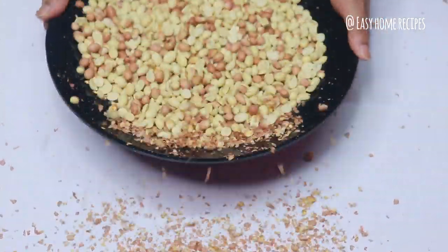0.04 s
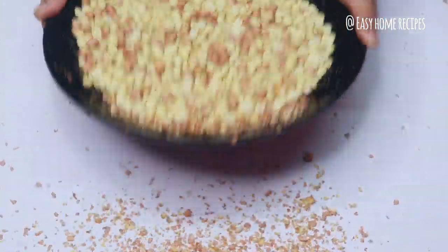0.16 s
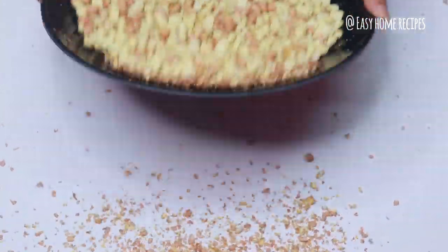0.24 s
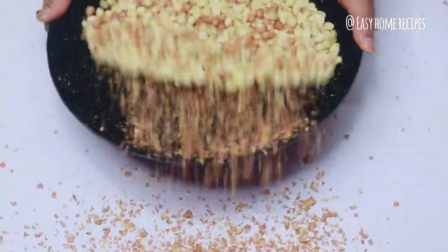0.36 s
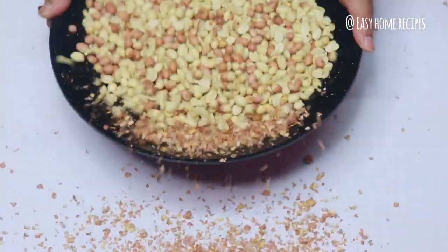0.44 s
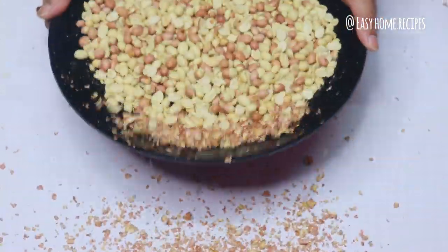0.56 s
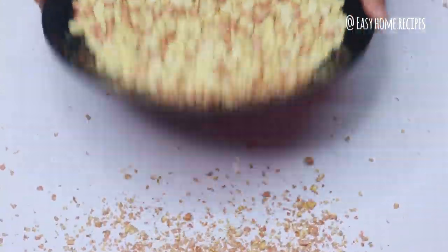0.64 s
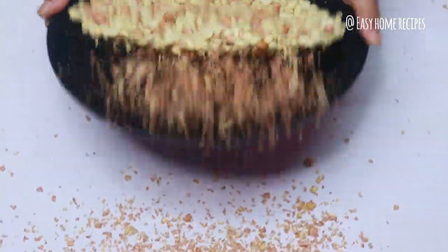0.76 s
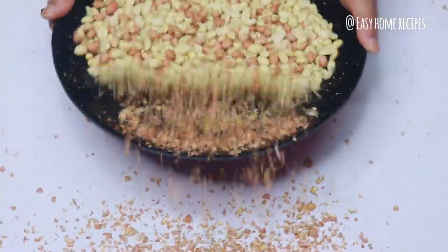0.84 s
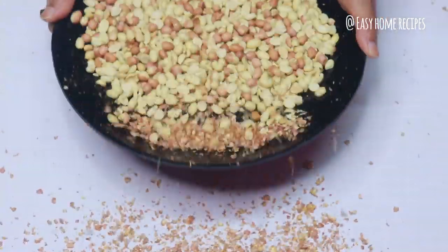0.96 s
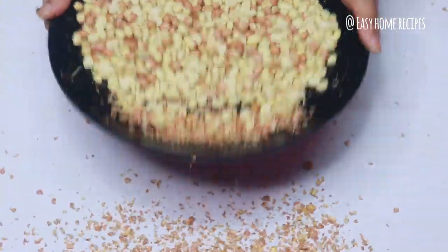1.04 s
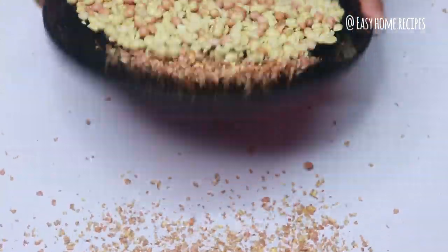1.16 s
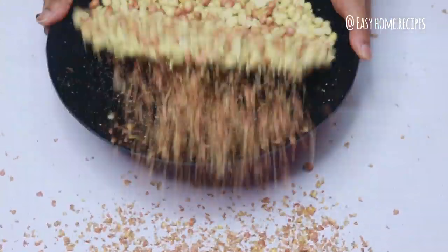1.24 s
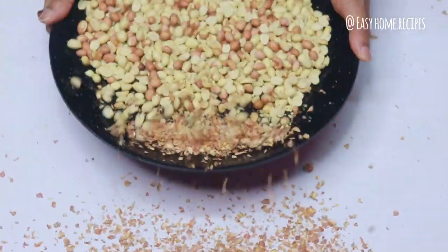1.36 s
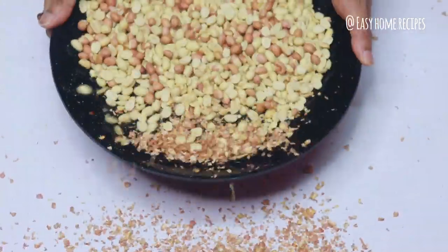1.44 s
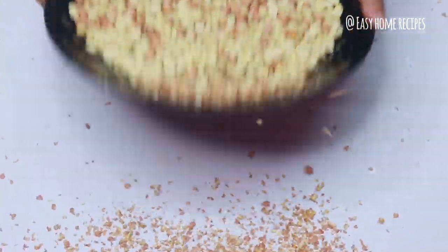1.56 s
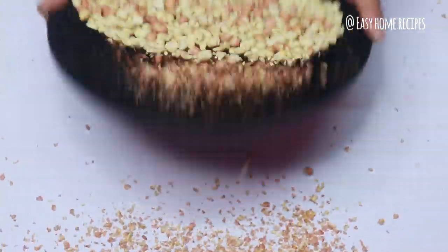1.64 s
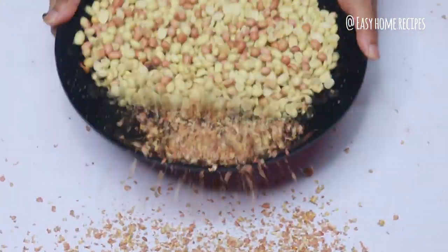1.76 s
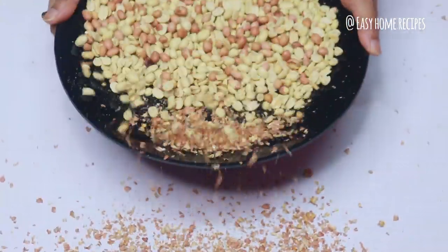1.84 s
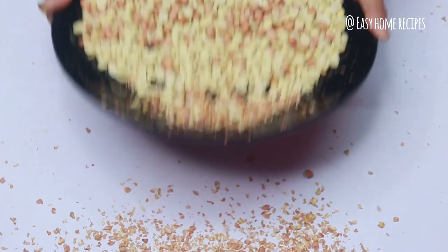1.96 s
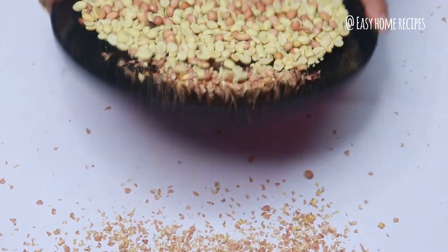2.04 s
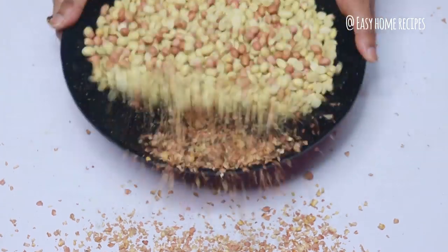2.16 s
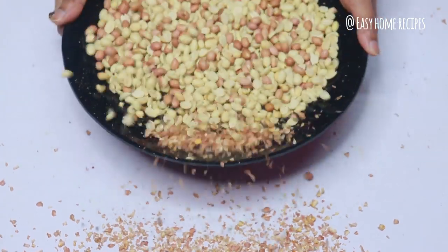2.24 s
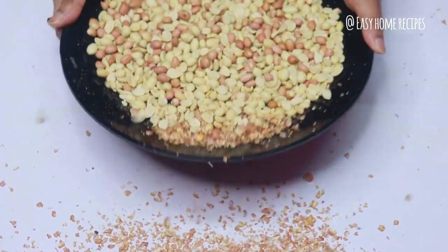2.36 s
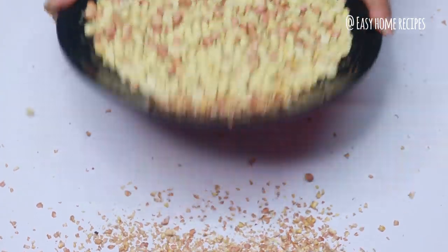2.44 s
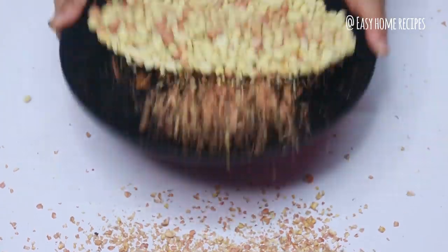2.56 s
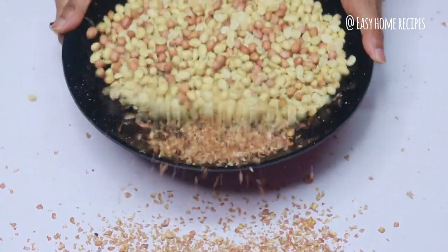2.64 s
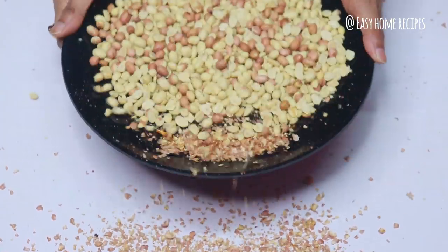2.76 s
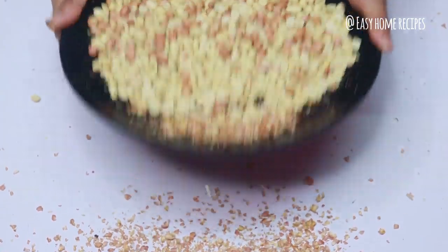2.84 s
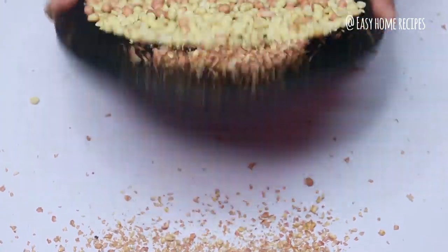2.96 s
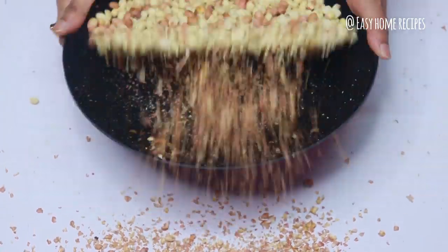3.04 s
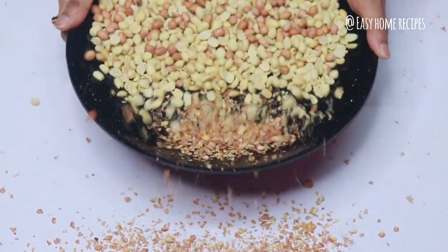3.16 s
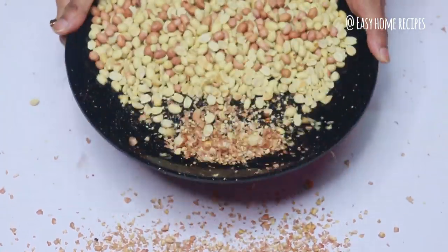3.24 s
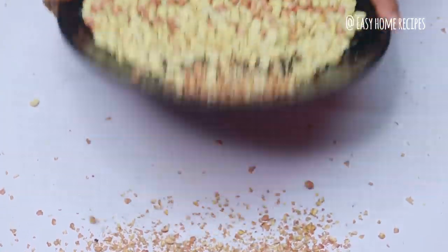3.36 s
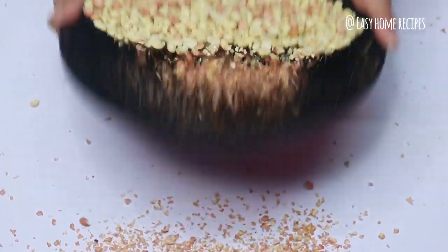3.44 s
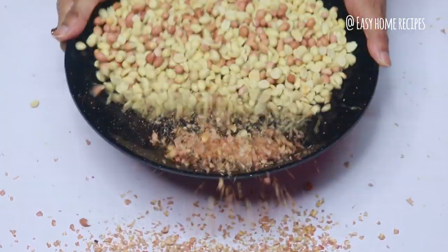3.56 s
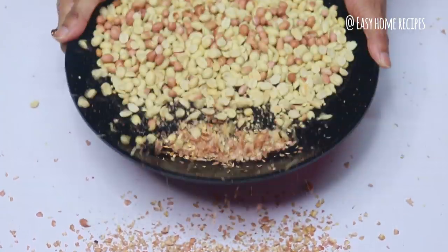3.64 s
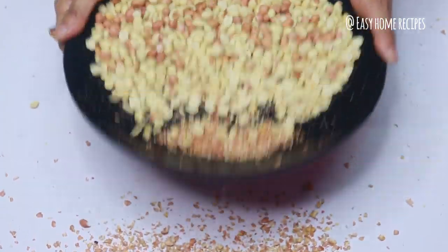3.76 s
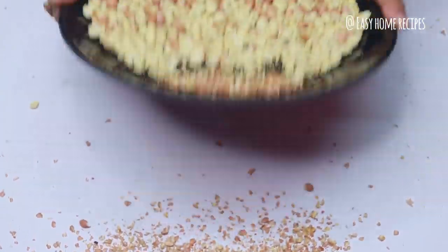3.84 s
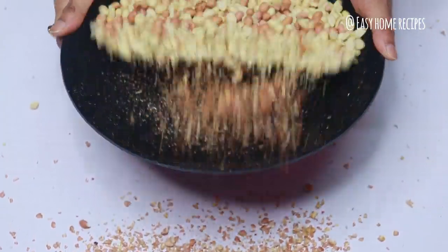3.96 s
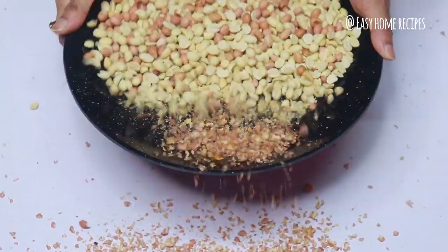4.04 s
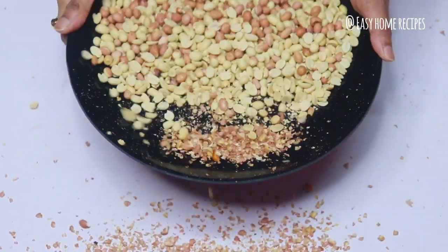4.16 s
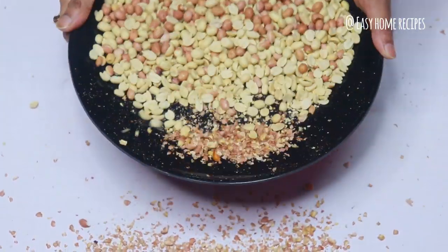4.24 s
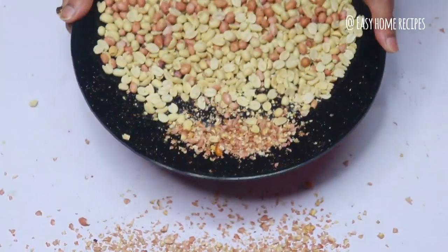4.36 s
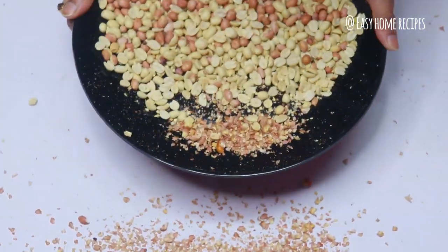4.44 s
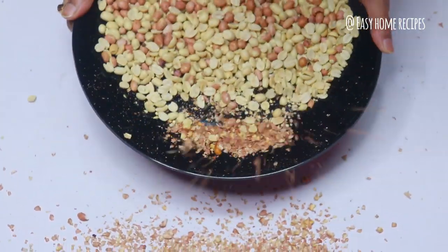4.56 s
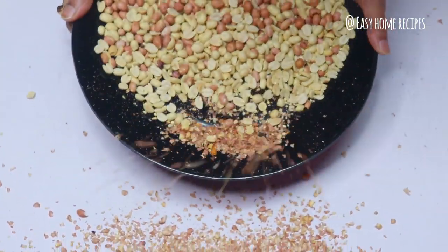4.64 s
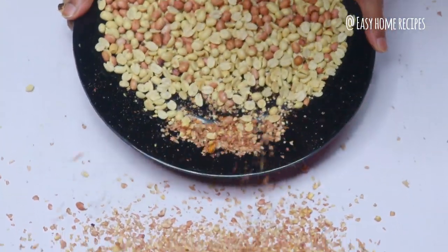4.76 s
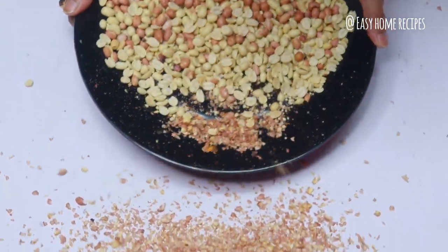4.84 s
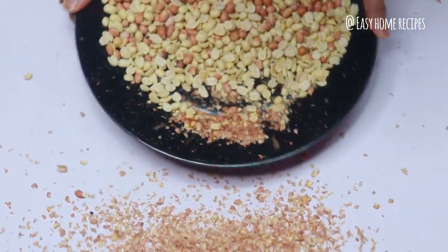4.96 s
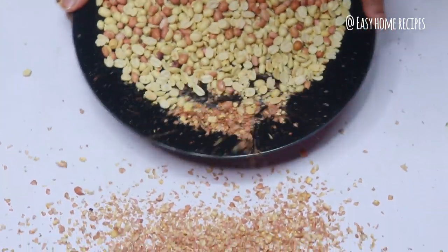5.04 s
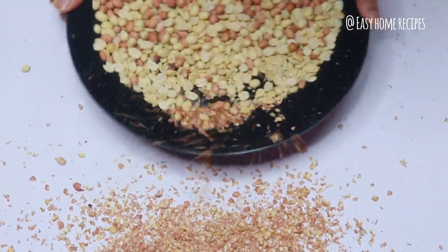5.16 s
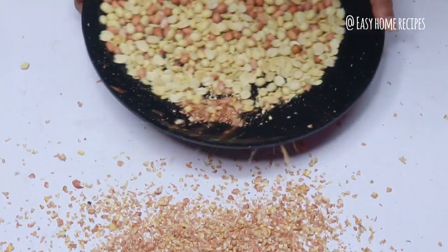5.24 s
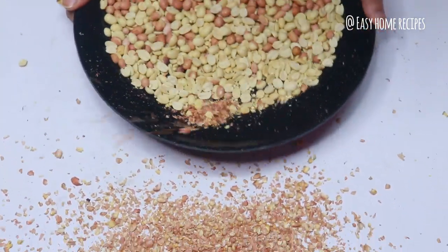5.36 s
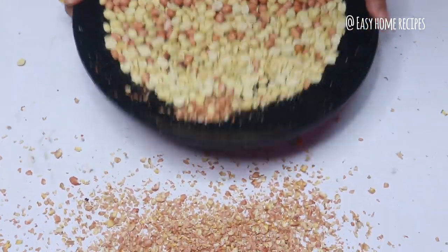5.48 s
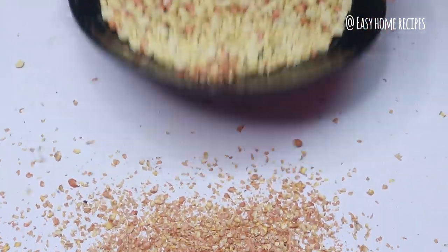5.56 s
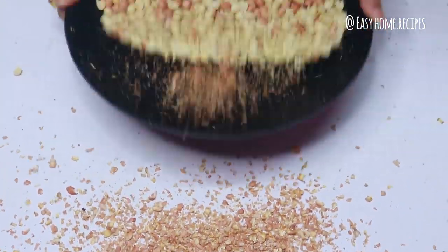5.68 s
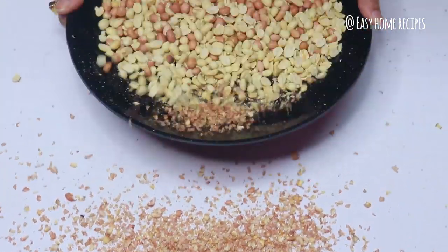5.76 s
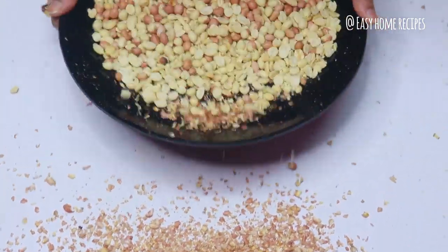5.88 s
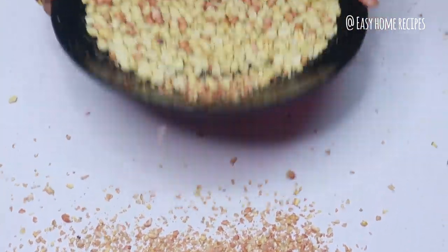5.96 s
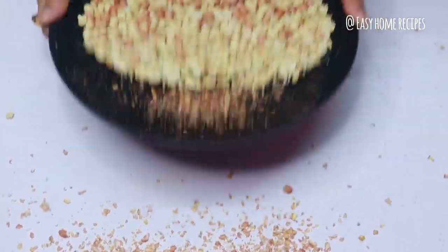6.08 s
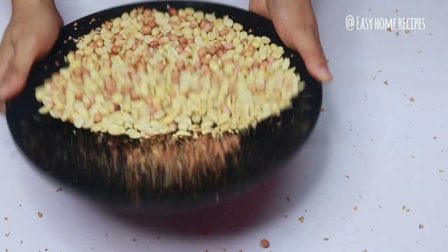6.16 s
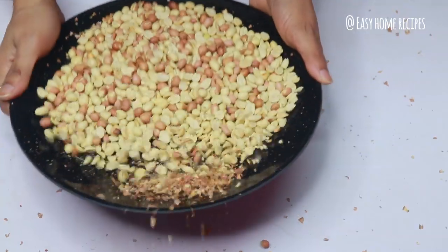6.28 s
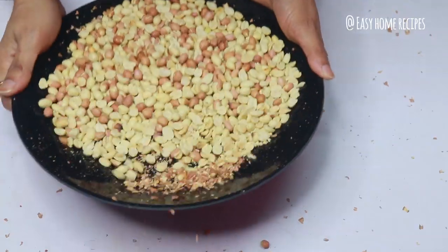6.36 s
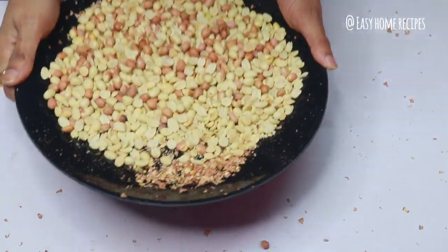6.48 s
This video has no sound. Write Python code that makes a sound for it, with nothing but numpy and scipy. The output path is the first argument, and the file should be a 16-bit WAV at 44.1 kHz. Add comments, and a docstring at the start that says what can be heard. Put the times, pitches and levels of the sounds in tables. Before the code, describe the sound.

Roasted peanuts tossed again and again on a hand-held plate, each landing a loud rattling shower, with a soft sliding pause and two knocks.

```python
"""Roasted peanuts are tossed on a hand-held plate in a kitchen to shake their loose skins off.
Each toss slides, then comes down as a shower of tiny impacts that ring the plate and the room;
loose nuts roll and skins tick after it. In the pause after four seconds the heap slides softly
and the plate is knocked twice, then the last tosses follow. Shaped noise gives steady still air and
low rumble, with rubbing whenever the hands shift. The near microphone clips the loudest peaks."""
import sys
import numpy as np
from scipy import signal
from scipy.fft import rfft, irfft, next_fast_len
from scipy.io import wavfile
from scipy.ndimage import uniform_filter1d, minimum_filter1d

SR = 44100
rng = np.random.default_rng(int(sys.argv[2]) if len(sys.argv) > 2 else 0)


def unload_wav(signal):
    """Save mono or channel-first audio to the path in sys.argv[1] as 16-bit WAV at rate SR, clipped to [-1, 1]."""
    wavfile.write(
        sys.argv[1],
        SR,
        np.round(np.clip(np.atleast_2d(signal).T, -1, 1) * 32767).astype(np.int16),
    )


N = 287355
SIZE = next_fast_len(N + SR)  # transform length, with room for tails
FREQ = np.maximum(np.arange(SIZE // 2 + 1) * SR / SIZE, 1)  # Hz
TIME = np.arange(N) / SR  # s

# Showers of landing nuts, from whole tosses down to small handfuls. Each row: start in seconds, rise in
# seconds, fall in seconds, level in dB, brightness in dB per octave, deep thud of the plate in dB,
# slide before it in dB, rolling after it in dB.
SHOWERS = [(-.135, 0.1, 0.061, -7, -2.3, -17, -48.5, -52), (.369, 0.054, 0.046, -4, -1, 5, -51, -45),
           (.738, 0.0031, 0.03, -34.5, -3, 2, -48, -58), (0.798, 0.068, 0.0496, -4.5, -1, 3.5, -45.5, -47),
           (1.253, .062, .054, -3, -1.43, 1, -56, -44), (1.712, 0.069, 0.045, -5.5, -1.06, 2.5, -54, -44),
           (2.139, 0.056, .041, -2, -1.5, 0, -46.5, -39), (2.604, 0.056, 0.045, -1.68, -1.4, -1, -53, -62),
           (3.034, 0.073, .062, -5, -1, 1.5, -48.5, -56), (3.503, .070, .048, -5.5, -0.84, 6, -57, -38),
           (3.968, 0.063, 0.06, -6, -0.93, 3, -66, -64), (5.693, 0.061, 0.041, -5.5, -2.5, -7, -52, -69),
           (6.170, .006, .025, -16, 0.1, 5, -50, -62), (6.198, .066, 0.048, -7, -1.13, 4, -63, -62)]
# Knocks on the plate. Each row: start in seconds, level in dB, contact cut-off in Hz.
PLATE_KNOCKS = [(5.400, -8, 1930), (5.438, 0, 3100)]
# The pause, with the heap moving on the tilted plate. Each row: time in seconds, level of the soft
# scraping in dB and of the rolling nuts in dB, both ahead of a trim.
TILT_PAUSE = [(4.38, -59, -69), (4.398, -56, -79), (4.706, -45.5, -71), (4.99, -50.5, -73),
              (5.032, -48.5, -55), (5.122, -54, -59), (5.23, -49.5, -55), (5.36, -48.5, -57)]
# The hands shift and swing the plate. Each row: middle in seconds, half length in seconds,
# boom in dB, dull rubbing in dB ahead of its flutter.
HAND_MOVES = [(0.19, 0.046, -39, -67), (0.344, 0.024, -47, -47), (1.46, 0.05, -41.5, -55),
              (2.27, 0.1, -42, -62), (2.81, 0.08, -37.5, -62), (4.31, 0.16, -34.5, -48),
              (4.712, 0.21, -39.5, -48), (5.54, 0.057, -32.5, -51), (5.79, .14, -37, -46),
              (6.02, 0.056, -38, -41.5)]
# Centres of the bands in which the nuts are shaped, in Hz.
NUT_BANDS = [350, 800, 1700, 3500, 7000, 14000]
MIDDLE_HZ = NUT_BANDS[2]  # brightness tilts around this note


def undb(db):
    """Decibels to gain."""
    return 10 ** (np.asarray(db) / 20)


def unit(x):
    """Scale to rms 1."""
    return x / np.sqrt(np.mean(x ** 2))


def contour(hz, values):
    """Join points by straight lines over log frequency."""
    return np.interp(np.log(FREQ), np.log(hz), values)


def filtered(x, response):
    """Pass a sound through a frequency response."""
    return irfft(rfft(x, SIZE) * response, SIZE)[:N]


def causal(db):
    """Minimum-phase response of unit energy: it rings after a hit, never before."""
    cepstrum = irfft(np.log(undb(db)), SIZE)
    # fold the mirrored half forward in time
    cepstrum[1:SIZE // 2] *= 2
    cepstrum[SIZE // 2 + 1:] = 0
    response = np.exp(rfft(cepstrum))
    return response / np.sqrt(np.mean(np.abs(response) ** 2))


def noise(colour):
    """Noise of rms 1 with a (Hz, dB) colour."""
    gain = undb(contour(*np.transpose(colour)))
    return unit(filtered(rng.standard_normal(N), gain))


def add(track, s, sound):
    """Mix a short sound in at time s."""
    start = max(int(s * SR), 0)
    track[start:start + len(sound)] += sound[:max(N - start, 0)]


def decay(t, t60):
    """Amplitude that dies by 60 dB in t60 seconds."""
    return np.exp(-np.log(1000) * t / t60)


def hump(s, width_s, db):
    """Power of a smooth swell centred on time s."""
    distance = (TIME - s) / width_s
    return (undb(db) * np.exp(-np.minimum(distance ** 2, 20))) ** 2


def wander(rate):
    """Random drift of rms 1 that takes a new direction `rate` times a second."""
    return unit(np.interp(TIME * rate, np.arange(256), rng.standard_normal(256)))


def impacts(chance):
    """Random impacts by chance per sample: positions, direction of push, weight as a bell-shaped score."""
    at = np.flatnonzero(rng.random(N) < chance)
    sign = rng.choice([-1, 1], len(at))
    weight = np.clip(rng.standard_normal(len(at)), -2, 2)
    return at, sign, weight


def kitchen(wet_db=0, gap_s=0.003, early_db=-5, early_s=0.0063):
    """Room from one spot: direct sound, quick echoes off rim and table, a diffuse tail dying band by band."""
    # Kitchen reverberation. Each row: band centre in Hz, t60 in seconds, relative tail level in dB.
    tail_bands = [(197, 0.14, 5.5), (860, 0.36, -1.5), (1540, 0.32, -2.5), (3430, 0.39, 3.5),
                  (5800, 0.33, -2), (8660, 0.3, -5), (15000, 0.15, -1.5)]
    t = TIME[:SR * 3 // 4]
    hz = np.maximum(np.arange(len(t) // 2 + 1) * SR / len(t), 1)
    centres = np.log([row[0] for row in tail_bands])
    wash = rfft(rng.standard_normal(len(t)))
    tail = 0
    for share, (_, t60, db) in zip(np.eye(len(tail_bands)), tail_bands):
        fade = decay(t, t60) * (t > gap_s)
        band = irfft(wash * np.interp(np.log(hz), centres, share), len(t))
        tail = tail + undb(db) * band * fade / np.linalg.norm(fade)
    # small surfaces scatter mostly the treble
    early = np.diff(rng.standard_normal(len(t) + 1)) * np.exp(-t / early_s)
    early = undb(early_db) * early / np.linalg.norm(early)
    return (1 + rfft(early + undb(wet_db) * tail, SIZE)) / np.sqrt(2)


def room_air(level_db=-48):
    """The still air of the room is steady noise that is strongest in the bass."""
    # Each row: frequency in Hz, relative level in dB.
    air_colour = [(30, -5.5), (150, -5), (400, -7), (1500, -9), (3000, -17.5), (6000, -25.5),
                  (15000, -28.5)]
    return undb(level_db) * noise(air_colour)


def plate_boom(rest_db=-52.5, wander_db=0.5, wander_per_s=3.5):
    """The handled plate booms as swells of low noise, over a faint wandering rumble."""
    # Each row: frequency in Hz, relative level in dB.
    boom_colour = [(20, -6.5), (38, -11.5), (57, 9.5), (75, -9), (100, -20.5), (170, -27.5), (280, -24),
                   (420, -32), (1000, -56)]
    swells = sum(hump(s, width, boom_db) for s, width, boom_db, _ in HAND_MOVES)
    rest = undb(rest_db + wander_db * wander(wander_per_s)) ** 2
    return np.sqrt(swells + rest) * noise(boom_colour)


def finger_rub(flutter_db=3, flutter_per_s=25):
    """The plate rubs under the fingers as the hands shift: swells of dull noise whose level flutters."""
    # Each row: frequency in Hz, relative level in dB.
    rub_colour = [(90, -19), (160, -2), (280, 6), (420, -13), (900, -57)]
    power = sum(hump(s, width, rub_db) for s, width, _, rub_db in HAND_MOVES)
    flutter = unit(undb(flutter_db * wander(flutter_per_s)))
    return np.sqrt(power) * flutter * noise(rub_colour)


def pause_power(db, fade_s=0.019):
    """Power along the pause, fading quickly outside it."""
    s = np.transpose(TILT_PAUSE)[0]
    outside = np.abs(TIME - np.clip(TIME, s[0], s[-1]))
    return undb(np.interp(TIME, s, db)) ** 2 * np.exp(-outside / fade_s)


def sliding_power(lead_s=0.068, slide_s=0.045, creep_lag_s=0.18, creep_s=0.11, creep_db=-43, trim_db=-1):
    """The heap slides forward before each shower, creeps back after it, and drifts on the tilted plate."""
    strokes = 0
    for s, *_, slide_db, _ in SHOWERS:
        strokes = strokes + hump(s - lead_s, slide_s, slide_db)
        strokes = strokes + hump(s + creep_lag_s, creep_s, creep_db)
    return strokes + pause_power(np.transpose(TILT_PAUSE)[1] + trim_db)


def scrape(slip_rate=600, size_db=4, low_hz=1100):
    """The heap creeps over the plate in many small, dull slips (slip_rate per second)."""
    # Each row: frequency in Hz, relative level in dB.
    scrape_colour = [(300, -28), (550, -17), (720, -6.5), (1050, -11.5), (1400, 4), (1850, 0.5),
                     (2300, -10), (3500, -19), (7000, -20), (15000, -40)]
    # Level of the low part of the scraping. Each row: time in seconds, lift in dB.
    low_lift = [(4.2, 14), (4.4, -2), (4.92, -1), (5.05, 16.5), (5.35, 15.5), (5.5, 2)]
    at, sign, weight = impacts(slip_rate / SR)
    slips = np.zeros(N)
    slips[at] = sign * undb(size_db * weight)
    sound = unit(filtered(slips, causal(contour(*np.transpose(scrape_colour)))))
    low = filtered(sound, 1 / (1 + (FREQ / low_hz) ** 6))
    high = sound - low
    lift = undb(np.interp(TIME, *np.transpose(low_lift)))
    return (high + low * lift) * np.sqrt(sliding_power())


def plate_response():
    """The loaded plate: the overall colour of nut on plate, with its resonances standing out."""
    # Each row: frequency in Hz, relative level in dB.
    body_colour = [(40, -48), (220, -48), (330, -33.5), (450, -17), (700, -9.5), (1000, -14.5), (1600, -8),
                   (2100, -16.5), (2900, -13), (4500, -16.5), (8500, -20.5), (10500, -22), (12500, -29),
                   (15300, -36)]
    # Resonances. Each row: frequency in Hz, width in Hz, lift in dB.
    resonances = [(440, 14, 2), (509, 8.4, 5), (617, 41, 1), (739, 27.4, 7.5), (798, 20, 7), (876, 33, 6),
                  (1077, 140, 2.5), (1192, 180, 4.5), (1342, 105, 4.5), (1670, 119, 0), (1798, 213, 8),
                  (2293, 156, 6.5), (2680, 285, 7.5), (2940, 85, 4), (3533, 110, 7.5), (4166, 190, 4),
                  (4910, 190, 5), (5350, 940, 4), (6100, 350, 7.5), (7230, 1100, 11), (8350, 280, 11),
                  (9290, 930, 6.5)]
    lifts = sum(db / (1 + (2 * (FREQ - hz) / width) ** 2) for hz, width, db in resonances)
    return causal(contour(*np.transpose(body_colour)) + lifts)


def flakes(lag_s=0.24, spread_s=0.14, middle_db=-33, scatter_db=3, bright_db=18):
    """One faint late flake of skin for each shower: (s, peak dB, brightness dB per octave)."""
    chance = rng.random((len(SHOWERS), 2))
    fallen = []
    for (s, *_), (late, big) in zip(SHOWERS, chance):
        db = middle_db + scatter_db * (2 * big - 1)
        fallen.append((s + lag_s + spread_s * late, db, bright_db))
    return fallen


def stragglers(plate, skitter_s=0.0015, size=4096):
    """Lone landings skitter on the plate for a moment: whole nuts are dull, flakes of skin bright."""
    # Single nuts and flakes that stand out. Each row: start in seconds, peak in dB ahead of the room,
    # brightness in dB per octave.
    lone_ticks = [(.051, -16, -8), (.661, -24, 12), (.774, -35, 5), (.820, -2, -4.5), (1.170, -26, 15),
                  (1.691, -18, -7), (1.716, -6, -4.5), (1.736, 3, -3), (2.137, -22, -4), (2.431, -23, 4),
                  (3.059, -12, -5), (3.721, -9.5, -0.5), (3.822, -26, 6), (5.035, -23, -2.5),
                  (5.558, -24.5, -7), (6.099, -25, -0.5)]
    ring = rfft(irfft(plate, SIZE)[:size])
    hz = np.arange(len(ring)) * SR / size
    octave = np.log2(np.maximum(hz, NUT_BANDS[0]) / MIDDLE_HZ)
    t = TIME[:size] - TIME[size // 128]  # a short silence precedes the contact
    out = np.zeros(N)
    for s, db, bright_db in [*lone_ticks, *flakes()]:
        contact = rng.standard_normal(size) * np.exp(-t / skitter_s) * (t >= 0)
        tick = irfft(rfft(contact) * ring * undb(bright_db * octave))
        add(out, s, undb(db) * tick / np.abs(tick).max())
    return out


def knocks(crack_db=-13, crack_t60=0.088, jostle_db=-20, jostle_t60=0.38, low_hz=170):
    """Two blunt blows: the plate's modes, a short crack and jostled nuts, dulled by the soft contact."""
    # Modes of the knocked plate. Each row: frequency in Hz, relative level in dB, t60 in seconds.
    knock_modes = [(260, -30, .1), (524, -31, .05), (800, -20, 0.074), (1102, -1, 0.11), (1284, 12.5, 0.03),
                   (1335, 2, 0.037), (1590, -6, 0.059), (1810, 2.5, 0.051), (2420, -5, .045),
                   (2900, -18, .033)]
    t = TIME[:SR // 4]
    ring = sum(undb(db) * np.sin(2 * np.pi * hz * t) * decay(t, t60) for hz, db, t60 in knock_modes)
    ring = ring / np.abs(ring).max()
    clatter = undb(crack_db) * decay(t, crack_t60) + undb(jostle_db) * decay(t, jostle_t60)
    out = np.zeros(N)
    for s, db, soft_hz in PLATE_KNOCKS:
        blow = ring + clatter * rng.standard_normal(len(t))
        contact = signal.butter(4, [low_hz, soft_hz], "bandpass", fs=SR, output="sos")
        add(out, s, undb(db) * signal.sosfilt(contact, blow))
    return out


def rolling_power(lag_s=0.247, roll_s=0.11, shaken_lag_s=0.22, shaken_s=0.089, shaken_db=-51, trim_db=3.5):
    """Loose nuts roll after each shower, after a knock shakes them loose, and while the plate is tilted."""
    landed = sum(hump(s + lag_s, roll_s, roll_db) for s, *_, roll_db in SHOWERS)
    shaken = sum(hump(s + shaken_lag_s, shaken_s, shaken_db) for s, *_ in PLATE_KNOCKS)
    return landed + shaken + pause_power(np.transpose(TILT_PAUSE)[2] + trim_db)


def shower_power(octave, first_db=-22, lead_s=0.035, swell_curve=1.7, settle_db=-23, settle_s=0.075,
                 lag_s=0.0028, slap_db=3, slap_s=0.03, slap_octave=-0.5):
    """Power of the landing nuts in a band, given in octaves above the middle of the range."""
    power = np.zeros(N)
    depth = np.clip(-octave - 1, 0, 1)  # the thud acts only on the lowest notes of the plate
    middle = np.clip(1.5 - abs(octave - slap_octave), 0, 1)
    for start, rise, fall, db, bright_db, thud_db, *_ in SHOWERS:
        # dull blows on the bare plate come first, bright nut-on-nut clicks a little later
        t = TIME - start - lag_s * octave * min(rise / fall, 1)
        swell = undb(first_db * np.clip(1 - t / rise, 0, 4) ** swell_curve)
        # a few light nuts graze the plate just ahead of the rest
        lead = np.exp(np.minimum(t, 0) / lead_s)
        after = np.maximum(t - rise, 0)
        dying = np.exp(-(after / fall) ** 2) + undb(settle_db) * np.exp(-after / settle_s)
        # the bulk of a hard toss slaps the plate at once and lifts its middle notes
        slap = slap_db * middle * undb(db) * np.exp(-((t - rise) / slap_s) ** 2)
        level = undb(db + bright_db * octave + thud_db * depth + slap)
        power += (level * lead * swell * dying) ** 2
    return power


def nuts(plate, peak_rate=1300, rest_rate=750, size_db=1.0, size_slope_db=2.3, colour_db=1.0, count=4):
    """Showers and rolling nuts as separate impacts of own size and colour, on `count` spots of the plate."""
    octaves = np.log2(np.array(NUT_BANDS) / MIDDLE_HZ)
    rolling = rolling_power()
    powers = [shower_power(octave) + rolling for octave in octaves]
    # a heavier shower has both more impacts (rates are per second) and harder ones
    loudness = np.sqrt(powers[2] / powers[2].max())
    chance = (rest_rate + peak_rate * loudness) / SR
    bands = [contour(NUT_BANDS, share) for share in np.eye(len(NUT_BANDS))]
    out = 0
    for _ in range(count):
        at, sign, weight = impacts(chance / count)
        force = 0
        for octave, band, power in zip(octaves, bands, powers):
            # heavy nuts carry the low end, light chips and skins the treble
            spread_db = (size_db - size_slope_db * octave) * weight
            size = undb(spread_db + colour_db * rng.standard_normal(len(at)))
            clicks = np.zeros(N)
            clicks[at] = sign * unit(size) * np.sqrt(power[at] / chance[at])
            force = force + band * rfft(clicks, SIZE)
        out = out + force * kitchen()
    return irfft(out * plate, SIZE)[:N]


def scene():
    """Showers and lone nuts ring the same plate; all the nuts, scrapes and knocks sound in the kitchen."""
    plate = plate_response()
    background = room_air() + plate_boom() + finger_rub()
    small = filtered(stragglers(plate) + scrape(), kitchen())
    blows = filtered(knocks(), kitchen(wet_db=-3.5))
    return (background + small + blows + nuts(plate))[None]


def record(dry, ceiling_db=3, size=128, top_hz=15700):
    """A quick limiter holds the loudest peaks, what is left clips at full scale, and the top is cut off."""
    allowed = np.minimum(1, undb(ceiling_db) / (np.abs(dry) + 1e-9))
    gain = uniform_filter1d(minimum_filter1d(allowed, size), size)  # windows in samples
    clipped = np.clip(dry * gain, -1, 1)
    top_cut = signal.ellip(10, 0.1, 70, top_hz, fs=SR, output="sos")
    return signal.sosfilt(top_cut, clipped)


dry = scene()
out = record(dry)
unload_wav(out)
```